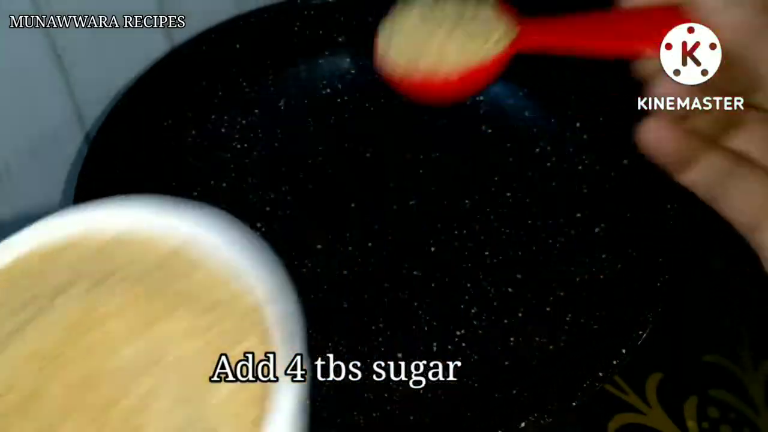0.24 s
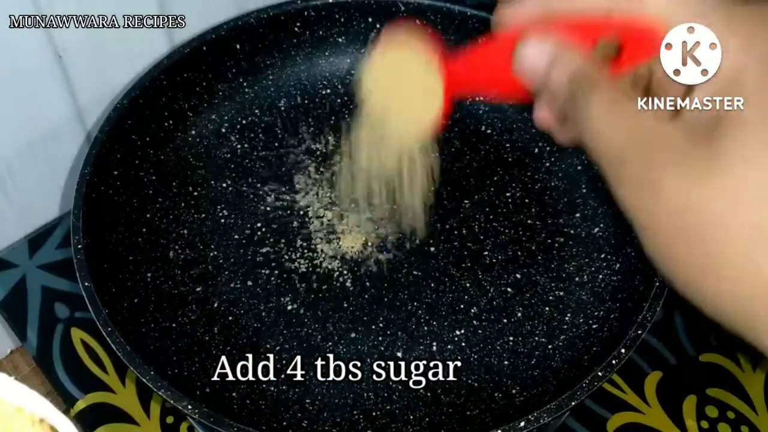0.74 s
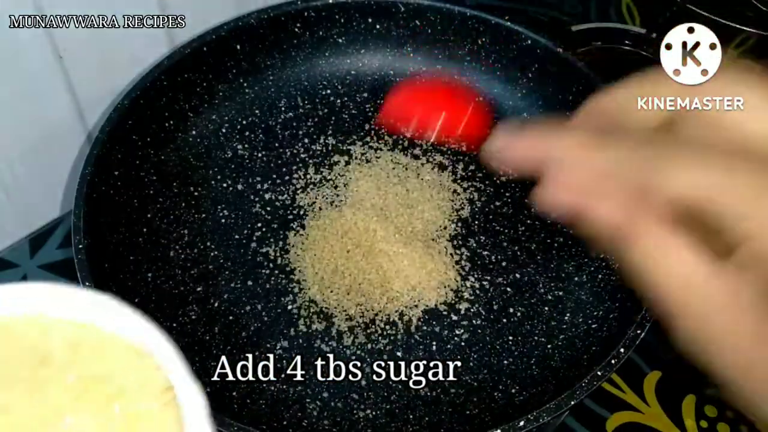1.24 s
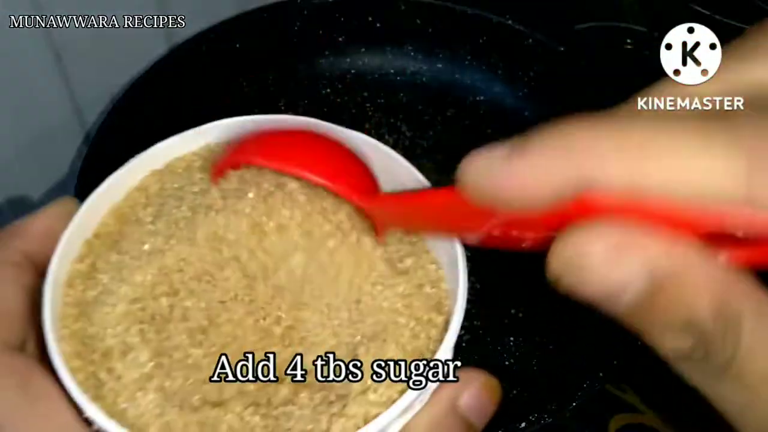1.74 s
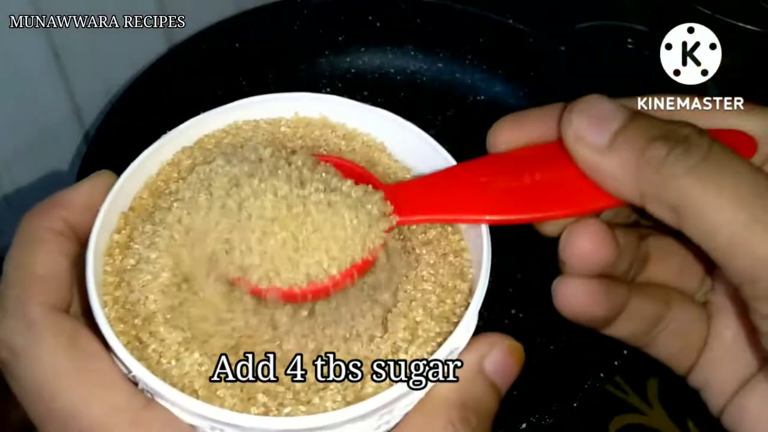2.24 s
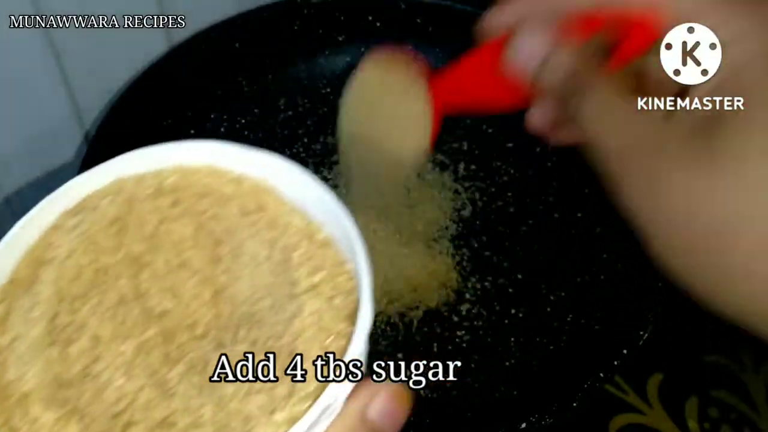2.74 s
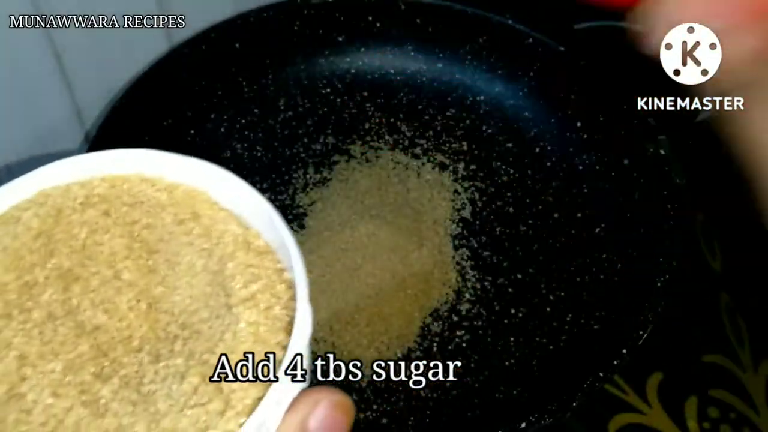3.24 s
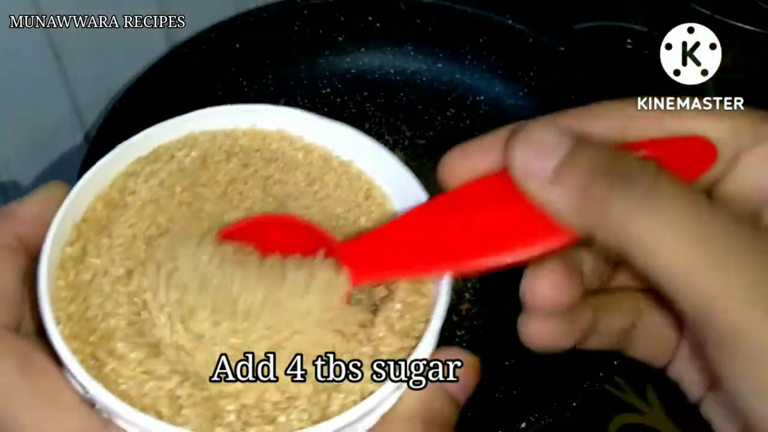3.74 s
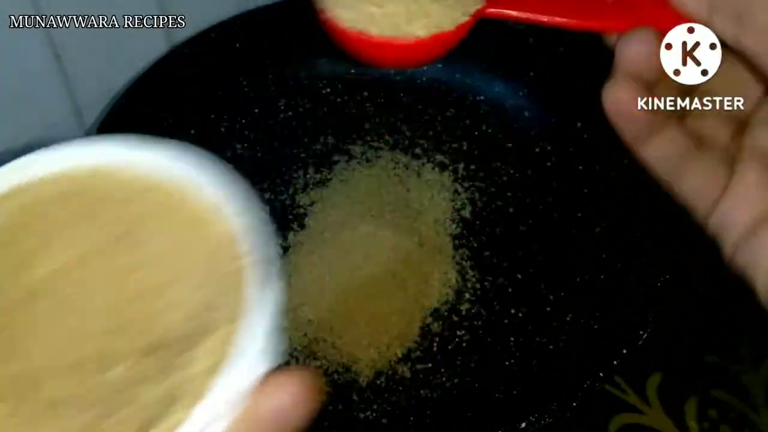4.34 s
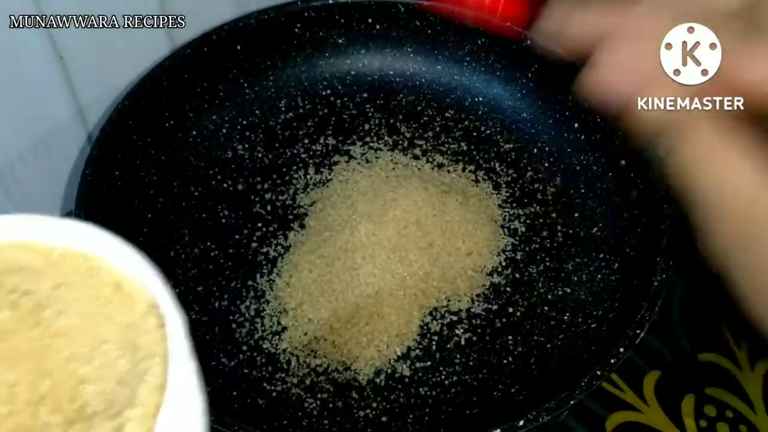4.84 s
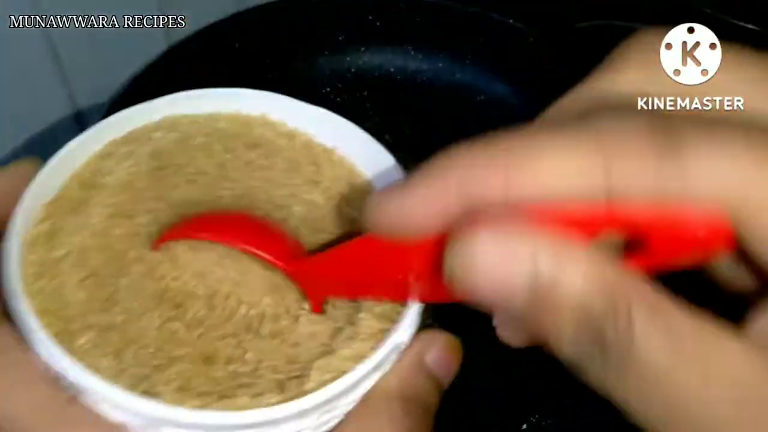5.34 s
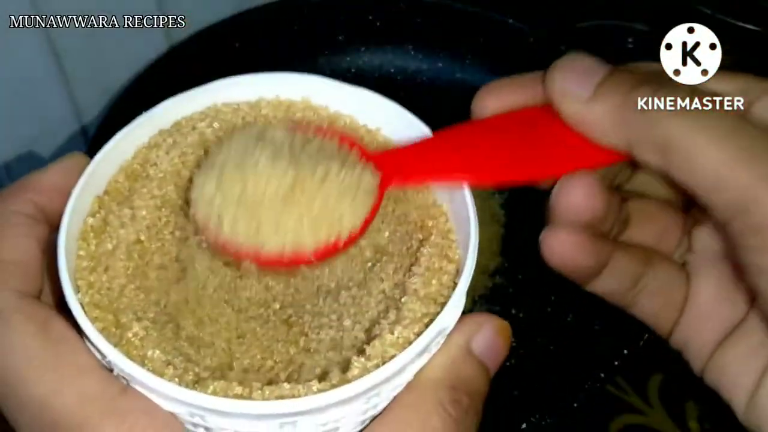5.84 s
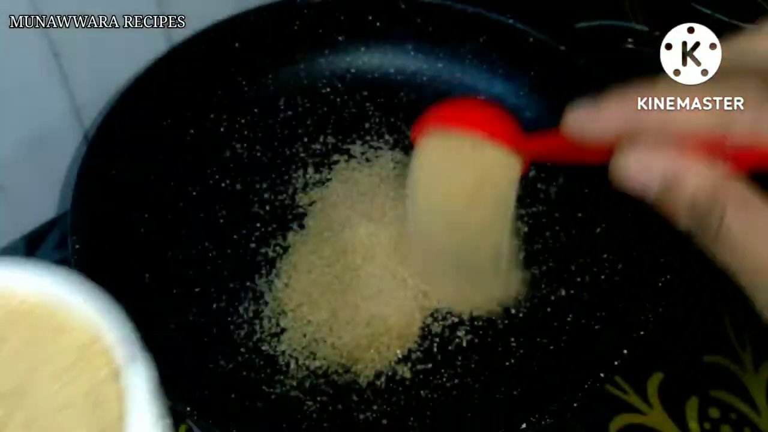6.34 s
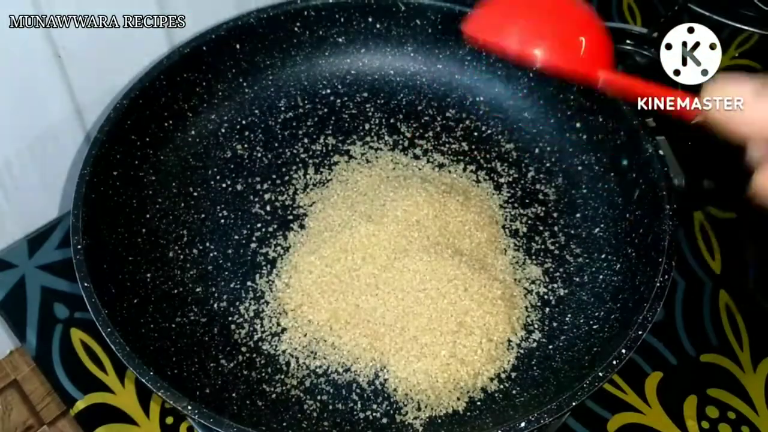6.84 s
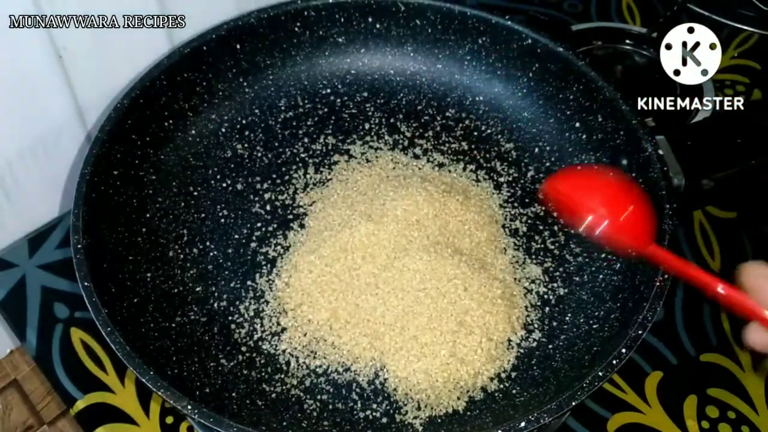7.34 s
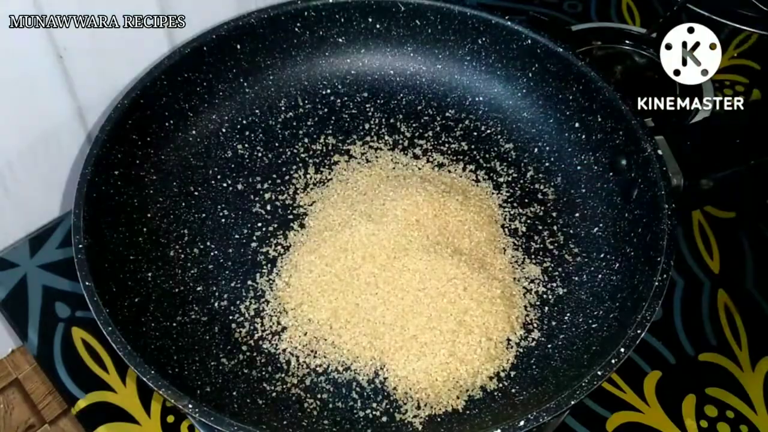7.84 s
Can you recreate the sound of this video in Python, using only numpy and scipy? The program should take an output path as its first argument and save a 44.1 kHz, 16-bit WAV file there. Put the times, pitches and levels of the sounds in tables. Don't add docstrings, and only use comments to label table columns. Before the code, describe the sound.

A close phone microphone in a small, hard kitchen; faint low rumble and a wavering hum underneath, weak details thinned by noise reduction. At 0 s a scrape through sugar is fading; from 0.4 to 0.9 s coarse crystals patter on a bare metal pan, bright and pinging. From 1 to 2 s the spoon grinds into the grit, with a crisp hard bite at 1.6 s. Crystals tick and fizz through 2 to 2.8 s, a stab at 2.55 s, a duller spill at 2.8 s. Digging resumes at 3.3 to 3.9 s with a sharp click at 3.4 s. Another spill hisses at 4.5 s, stabs at 4.7 and 5.1 s, a hollow deep scrape at 5.3 s, a soft stab at 5.9 s, last spill at 6.3 s. Near quiet, then two very loud ringing rim knocks at 7.2 and 7.4 s, a low pan thud at 7.46 s, and a tiny click and scrape around 7.9 to 8.1 s.

```python
import sys
import numpy as np
from scipy import signal
from scipy.fft import rfft, irfft, next_fast_len
from scipy.io import wavfile
from scipy.ndimage import uniform_filter1d, map_coordinates

SR = 44100
rng = np.random.default_rng(int(sys.argv[2]) if len(sys.argv) > 2 else 0)


def invert_db(x):
    u = np.asarray(x, float) / 20
    return 10 ** u


def master_out(mix):
    frames = np.transpose(np.atleast_2d(mix))
    ceiling = np.clip(frames, -1, 1)
    pcm = np.round(ceiling * 32767).astype(np.int16)
    wavfile.write(sys.argv[1], SR, pcm)


N = 356187

# freq_hz, density_db_per_hz
GRIT = [(350, -35), (600, -32.5), (860, -32), (1020, -16), (1980, -17), (2150, -12.5), (2400, -12.5),
        (4340, -9.5), (5710, -2), (7940, 4.5), (11200, -4), (14900, -0.5), (16000, 1.5)]
ZONE_EDGES_HZ = (1900, 4500, 10000)
# time_s, fizz_db, depth_0_1
STIR = [(.36, -110, 1), (.62, -67, 0.88), (.93, -60, 0.91), (1.05, -65, 1), (1.3, -55, 0.72),
        (1.42, -60.5, 0.82), (1.55, -59, 0.67), (1.74, -58.5, 0.95), (2.03, -67.5, 1.02),
        (2.23, -73.5, 0.2), (2.52, -68, 0.6), (2.95, -63.5, 0.51), (3.22, -65, 0), (3.8, -80, 0.3),
        (4.45, -78.5, 0.37), (5.2, -105, 0.4)]
# peak_s, fizz_db, rise_s_per_20db, t60_s, depth_0_1
DIGS = [
    (0.0, -75, .05, 0.33, 1.24),
    (1.345, -62, 0.86, 0.1, 0.4),
    (1.599, -40, 0.05, 0.23, 0.2),
    (1.79, -55.5, 1.09, 0.95, 0.2),
    (3.542, -55, 0.18, 0.56, 0.69),
    (3.86, -74, 0.04, 0.1, 0.5),
    (5.31, -55, .07, 0.5, 0.8),
]
# peak_s, fizz_db, t60_s, depth_0_1
STABS = [
    (2.549, -61.5, 0.48, 0.74),
    (3.345, -63, 0.35, 1),
    (3.868, -68, 0.45, 0.45),
    (4.672, -69.5, 0.52, 0.85),
    (5.084, -56.5, 0.46, 0.8),
    (5.914, -65.5, 0.34, 0.67),
    (8.062, -72.5, .3, 0.4),
]
# bowl_db, crunch_db, fizz_db, air_db
DIG_SHALLOW_DB = (-31.5, -16, 0, -5)
DIG_DEEPER_DB = (28.5, 14, -0.5, 5)
# peak_s, fizz_db, t60_s, fineness_db
SPILLS = [(.17, -72.5, 1, -36), (2.074, -57, 0.52, -2), (2.262, -59, 0.5, -6), (2.284, -56.5, 0.29, -5),
          (2.358, -57, 0.44, -16), (2.61, -58.5, 0.16, 6), (2.673, -55, 0.55, -3), (2.77, -55, .2, -2),
          (2.8, -53, 0.24, 6.5), (3.325, -58, 0.1, 0), (4.524, -56, 0.37, -1.5), (5.262, -55, 0.36, -1.5),
          (5.686, -72.5, 0.17, -16), (6.15, -71.5, 0.63, -3.5), (6.325, -52.5, 0.52, -4.5),
          (6.661, -93, 0.29, 17.5), (6.763, -77.5, 0.22, 12), (7.72, -79, 0.43, -17.5),
          (8.002, -71.5, 0.46, 0.5)]
SPILL_DB = (-35, -16, -2, 2.5)
SPILL_FINER_DB_PER_DB = (0.97, -.2, -0.00084, 1)

# start_s, peak_db, centre_hz, slide_rel_db
TICKS = [(.061, -62, 11200, -20), (0.0807, -44, 7200, -22), (.0807, -50, 5200, -20),
         (.0807, -48, 13600, -22), (1.0193, -44, 8300, -10), (1.1884, -39, 7600, -13),
         (1.2627, -41, 7750, -13), (1.326, -42, 8400, -10), (1.3328, -31, 7950, -17),
         (1.431, -42, 9600, -10), (1.5715, -35, 6900, -12), (1.592, -36, 7670, -16),
         (1.416, -42, 4140, -9.5), (1.512, -42, 6950, -5), (1.7679, -37, 7800, -10),
         (2.0657, -42, 10500, -20), (2.0719, -42, 9200, -15), (2.1269, -37, 9000, -17),
         (2.1486, -39, 9300, -24), (2.2441, -50, 11000, -20), (2.2531, -43, 9700, -14),
         (2.2573, -45, 7500, -8), (2.3482, -38, 8400, -20), (2.3561, -37, 8140, -15),
         (2.4164, -37, 10000, -17), (2.4384, -37, 9700, -22), (2.5267, -42, 7600, -11.5),
         (2.5384, -42, 12400, -18), (2.6683, -33, 8100, -15), (2.7394, -41, 7700, -18),
         (2.7881, -27.5, 9850, -26), (2.7933, -33, 10900, -21), (2.7945, -34, 8500, -22),
         (2.7965, -36, 9500, -22), (3.2881, -49, 7640, -10.5), (3.3189, -47, 6900, -8),
         (4.5131, -44, 9840, -15), (5.2598, -41, 8000, -16), (6.3122, -42, 7760, -12)]
# start_s, peak_db, centre_hz, slide_rel_db
CLICKS = [
    (3.4241, -26, 5150, -23),
    (3.866, -39, 4200, -20),
    (5.0803, -30, 3300, -13),
    (5.088, -39, 3800, -12),
    (6.1434, -58, 8580, -8),
    (6.1752, -43, 5400, -22.5),
    (6.657, -60, 13000, -18),
    (7.8706, -51, 5000, -20),
]
# start_s, peak_db, centre_hz, slide_rel_db
TAPS = [(.005, -58, 3300, -14), (3.4243, -40, 2700, -22), (4.668, -66, 1350, -8), (4.766, -68, 550, -14),
        (1.276, -45.5, 3800, -8), (1.3533, -44, 3100, -8), (1.466, -45, 4100, -5.5), (1.575, -43, 4130, -3),
        (1.727, -47, 2150, -10), (1.727, -50, 1620, -10), (2.548, -57.5, 3920, 0), (3.4243, -41, 1370, -21),
        (3.8655, -53, 1270, -12), (4.766, -61, 1250, -9), (5.0805, -32.5, 1320, -20),
        (5.0812, -33, 2390, -18.5), (7.87, -62, 3280, -12.5), (7.999, -62.5, 1600, -19),
        (8.016, -66, 2680, -15), (5.7568, -54, 2000, -19), (5.7568, -57, 3000, -17),
        (5.915, -49.5, 1880, -16)]

# start_s, peak_db, crack_t60_s
KNOCKS = [
    (7.224, -8.5, 0.014),
    (7.389, -9, 0.016),
]
# freq_hz, density_db_per_hz
CRACK = [
    [(290, -49.5), (500, -25), (1400, -17.5), (2000, 0), (2600, -1), (3100, -14.5), (4550, -6),
     (5180, -10.5), (5640, -9), (7740, -6), (15400, -33.5)],
    [(290, -49), (800, -18), (1400, -12), (1850, -1), (2960, -14), (3520, -5.5), (5180, -15), (7630, -0.5),
     (9320, -11), (13500, -10), (15400, -22)],
]
# freq_hz, level_db, t60_s
SPOON_MODES = [
    [(1750, -9, .03), (2210, 0, .045), (2460, -1, .04), (2720, -5, .03), (3520, -5, .035), (4600, -6, .03),
     (5730, -4, .04), (7800, -4, .03), (11500, -9, .02)],
    [(900, -16, .04), (1690, -1, .035), (1860, -3, .035), (3570, -5, .035), (4500, -9, .03),
     (5700, -5, .03), (6400, -6, .03), (7450, 1, .03), (7950, -1, .025)],
]
# freq_hz, level_db, t60_s
RIM_MODES = [
    [(2019, -7, 0.17), (2229, -12, 0.2), (2457, -13, 0.12), (2880, -18, 0.2), (3488, -12, 0.14),
     (3962, -19, 0.25), (4118, -12, 0.14), (4651, -1, 0.2), (4613, -13, 0.25), (7424, -18, 0.27),
     (5700, -8, 0.19), (6998, -14, 0.16), (7930, -18, 0.2), (8070, -22, 0.26)],
    [(1852, -13, 0.23), (2024, -8, 0.12), (2880, -23, 0.25), (3590, -21, 0.27), (4102, -20, 0.22),
     (4646, -11, 0.12), (5696, -11, 0.14), (5730, -20, .36), (6400, -16, 0.25), (6998, -19, 0.3),
     (7700, -21, .36), (8995, -12, 0.096), (7381, 0, 0.071), (8037, -9, 0.087)],
]
# freq_hz, density_db_per_hz
WALL_ECHO = [
    [(120, -40), (200, -23), (293, -6), (461, -15), (782, -20), (2280, -8), (3110, -17), (4640, -9.5),
     (8150, -14), (15400, -35.5)],
    [(120, -24.5), (200, -5), (327, -4), (1400, -11.5), (1840, -8), (2740, -18), (3600, -13.5), (4990, -15),
     (7440, -5.5), (15400, -24)],
]
# freq_hz, level_db, t60_s
FLOOR_MODES = [(119, 0, .14), (235, -10, .12), (294, -11, 0.24), (349, -4, .14), (460, -12, 0.25),
               (620, -12, .12), (880, -6, 0.14), (1000, -9, .12)]

# start_s, length_s, pitch_hz,
# width_hz, level_db
DRAGS = [(0.14, 0.12, 5400, 705, -66), (.17, .22, 7700, 500, -76), (0.196, 0.094, 950, 280, -69.5),
         (.42, .17, 1500, 500, -77), (2.75, .13, 1050, 250, -73), (.2, .07, 2500, 1500, -76),
         (.21, .22, 11500, 4000, -74), (1.1, .48, 600, 150, -75), (2.4, .12, 1400, 250, -78),
         (0.574, 0.44, 588, 105, -71), (2.047, 0.24, 910, 250, -72.5), (2.303, 0.16, 940, 200, -79.5),
         (2.535, 0.13, 790, 250, -71.5), (2.48, 0.44, 343, 82.5, -60.5), (2.854, 0.34, 1690, 134, -78.5),
         (3.24, .1, 2900, 300, -76), (3.27, .08, 2150, 150, -76), (3.335, .1, 1120, 250, -70),
         (3.447, 0.31, 1080, 420, -63), (3.7, .09, 2150, 120, -76), (4.49, .04, 620, 150, -78),
         (4.66, 0.1, 1330, 250, -73), (4.62, .05, 480, 120, -75), (4.67, 0.07, 600, 300, -74),
         (5.24, 0.27, 1080, 380, -55), (5.3, .2, 760, 200, -68), (5.52, .16, 6100, 500, -82),
         (6.17, .09, 4400, 900, -79), (5.618, 0.07, 1210, 145, -78.5), (5.675, 0.22, 1800, 160, -81),
         (5.7, .17, 2800, 350, -81), (5.76, .17, 2100, 120, -80), (5.94, .09, 650, 150, -80),
         (5.906, 0.2, 1900, 403, -72), (6.292, 0.27, 460, 92, -77.5), (6.293, 0.15, 1570, 200, -75),
         (1.68, 0.51, 800, 252, -68.5), (7.953, 0.12, 320, 88, -70.5), (8.011, 0.06, 5630, 497, -72),
         (8.053, 0.046, 1190, 350, -67.5), (8.061, 0.064, 396, 120, -68)]

# time_s, level_db
ON_BARE = [
    (0.39, -94.5),
    (0.396, -57),
    (0.51, -60.5),
    (0.73, -42.5),
    (0.764, -39),
    (1.0, -59),
]
# time_s, level_db
ON_LOADED = [
    [(2.78, -64), (2.79, -57), (2.87, -57), (3.194, -79), (3.3, -79)],
    [(4.5, -59.5), (4.516, -50), (4.818, -82.5), (4.9, -76)],
    [(6.28, -66.5), (6.316, -52.5), (6.552, -81), (6.62, -104)],
]
# start_s, peak_db, t60_s
DROPS = [(0.3982, -36.5, 0.07), (0.4482, -34, 0.044), (0.4776, -41, 0.05), (0.5117, -36, 0.084),
         (0.56, -43, 0.072), (0.5692, -39, 0.13), (0.6072, -32.5, 0.21), (0.6417, -43, 0.059),
         (0.705, -38, 0.06), (0.7554, -32, 0.07), (.814, -35, .08), (0.8305, -35, 0.04)]
# centre_hz, width_hz, level_db
PAN = [(2170, 24, -9), (3420, 28, -10), (3970, 38, -14), (4350, 70, -12), (5000, 70, -5), (5880, 60, -8),
       (6690, 57, -3), (7100, 120, -4), (7720, 60, 3), (7930, 50, 3), (8300, 100, -3), (8800, 80, 2),
       (9890, 100, -10), (11400, 120, -9)]
# centre_hz, width_hz, level_db
PAN_WALL = [(2460, 35, -15), (2880, 35, -17), (4650, 40, -13), (5370, 55, -12), (5600, 60, -11),
            (6010, 25, -8), (6390, 40, -8), (6980, 30, -3), (9270, 44, -8), (9420, 36, -8), (9670, 30, -9),
            (10500, 80, -10), (12300, 90, -13)]
# centre_hz, width_hz, level_db
LOADED = [(1490, 680, -15), (2464, 170, -3), (3410, 53, -1.5), (5530, 290, -1.5), (6750, 100, 3.5),
          (6900, 17, -8), (7600, 41, 2), (8100, 66, 8.5), (9100, 520, 0), (9640, 53, -3), (11100, 27, 1),
          (11300, 120, -3)]
# start_s, pitch_hz, level_db, t60_s
NOTES = [
    (.306, 2460, -80, .3),
    (.402, 2170, -64, .5),
    (.445, 2176, -69, .3),
    (.57, 3420, -69, .5),
    (.612, 2170, -62, .2),
    (.612, 5000, -61, .25),
    (.755, 2170, -58, .25),
    (.775, 3420, -66, .4),
    (.78, 4340, -64, .4),
    (.92, 3420, -68, .3),
]

# start_s, level_db
THUD = (7.4605, -30)
# freq_hz, level_db, t60_s
HOB_MODES = [(147.4, 0, 0.25), (180, -7, 0.15), (222, -5, 0.09), (290, -6, .06), (337, -9, 0.27)]

# freq_hz, t60_s
KITCHEN_T60 = [(150, 0.52), (1000, 0.33), (4000, 0.34), (14000, 0.28)]
# freq_hz, density_db_per_hz
RUMBLE = [(12, -48), (20, -2), (37, -14), (56, -7), (80, -2.5), (151, -2.5), (201, -10.5), (234, -22),
          (320, -59), (420, -50), (700, -120)]
# freq_hz, density_db_per_hz
HUM = [(110, -40), (165, -4), (220, -2.5), (280, -7), (328, -1), (438, -12), (503, -6.5), (750, -30.5),
       (980, -44), (1650, -120)]
# peak_s, level_db, rise_s_per_20db, t60_s
HUM_SWELLS = [(0.0, -55.5, .05, 0.27), (.66, -72, 0.65, 1.2), (1.2, -63, 1, 0.49), (1.8, -57.5, 0.3, 2.9),
              (2.7, -59.5, 0.6, 1.8), (3.2, -64, 0.84, 1.05), (3.52, -66, 0.5, .35), (3.9, -70, 0.15, 0.27),
              (4.2, -71, 0.14, 0.38), (4.85, -75, .25, .7), (5.33, -71, 0.1, 0.3), (5.77, -74.5, .05, .15),
              (6.36, -82, 0.2, 0.57)]
# freq_hz, level_db
SUPPRESS = [(250, -130), (450, -100), (1500, -100), (5000, -99), (15000, -100)]
# freq_hz, density_db_per_hz
HISS = [(150, -25.5), (300, 8), (1000, -1.5), (3000, -7.5), (8000, -9), (15000, -7)]


def sugar():
    stab_rise_s, spill_rise_s = 0.005, 0.01
    stir_db, stir_depth = curves(STIR)
    bites = DIGS + [(s, db, stab_rise_s, t60_s, depth) for s, db, t60_s, depth in STABS]
    bite_depth = np.array(bites)[:, 4]
    bite_power = swells(bites)
    spill_power = swells([(s, db, spill_rise_s, t60_s) for s, db, t60_s, _ in SPILLS])
    fineness_db = np.array(SPILLS)[:, -1]

    rub = patchy(patter(spread_db=3.5, clump_db=0.6), patchy_db=1.5, tall=8, long=9)
    rub = unit(patchy(rub, patchy_db=2, tall=30, long=2))

    def below(edge, hz):
        return 1 / (1 + (hz / ZONE_EDGES_HZ[edge]) ** 10)

    zones = [lambda hz: below(0, hz),
             lambda hz: below(1, hz) - below(0, hz),
             lambda hz: below(2, hz) - below(1, hz),
             lambda hz: 1 - below(2, hz)]
    settings = zip(zones, DIG_SHALLOW_DB, DIG_DEEPER_DB, SPILL_DB, SPILL_FINER_DB_PER_DB)
    out = 0
    for zone, shallow_db, deeper_db, spill_db, finer in settings:
        strokes = invert_db(2 * (shallow_db + deeper_db * bite_depth)) @ bite_power
        strokes = strokes + invert_db(2 * (spill_db + finer * fineness_db)) @ spill_power
        stirring = invert_db(stir_db + shallow_db + deeper_db * stir_depth)
        gain = np.hypot(smooth(strokes), stirring)
        out = out + gain * unit(filtered(rub, lambda hz: invert_db(along(GRIT, hz)) * zone(hz)))
    return out


def ticks():
    snap_delay_s, crack_t60_s = 0.001, 0.002
    out, t = np.zeros(N + SR), np.arange(SR // 4) / SR
    # table, width over centre, slide_t60_s
    kinds = (TICKS, 0.16, 0.19), (CLICKS, 0.69, 0.016), (TAPS, 0.16, 0.2)
    for rows, wide, slide_t60_s in kinds:
        for s, db, hz, slide_db in rows:
            width_hz = wide * hz
            crack = invert_db(-60 * t / crack_t60_s) * rng.standard_normal(len(t))
            crack = filtered(crack, resonance(hz, 2 * width_hz))
            slide = invert_db(-60 * t / slide_t60_s) * rng.standard_normal(len(t))
            slide = filtered(slide, resonance(hz, width_hz))
            contact = crack / np.abs(crack).max() + invert_db(slide_db) * slide / np.std(slide[:400])
            out[round((s + snap_delay_s) * SR):][:len(t)] += invert_db(db) * contact
    return out[:N]


def knocks():
    hold_s, bloom_s = 0.003, 0.014
    out, t = np.zeros(N + SR), np.arange(SR // 2) / SR
    for (s, db, t60_s), rim, plastic, colour, echo in zip(KNOCKS, RIM_MODES, SPOON_MODES, CRACK, WALL_ECHO):
        blow = invert_db(-60 * np.maximum(t - hold_s, 0) / t60_s) * rng.standard_normal(len(t))
        crack = filtered(blow, lambda hz: invert_db(along(colour, hz)))
        walls = filtered(kitchen(t == 0), lambda hz: invert_db(along(echo, hz)))
        bloom = (1 - np.exp(-t / bloom_s)) * ring(FLOOR_MODES, t, shorten=0.98, scatter_db=1.5)
        voice = invert_db(-6) * crack / np.abs(crack).max()
        voice = voice + invert_db(-12.5) * ring(plastic, t, shorten=0.93, scatter_db=-0.5)
        voice = voice + invert_db(-19) * ring(rim, t, shorten=0.96, scatter_db=-0.5)
        voice = voice + invert_db(-27.5) * walls / np.std(walls[300:1500]) + invert_db(-23.5) * bloom
        out[round(s * SR):][:len(t)] += invert_db(db) * voice
    return out[:N]


def pan(spans, drops, peaks, flow_db, dull_db):
    landing_t60_s = 0.006
    s = np.arange(round((spans[-1][-1][0] + 0.5) * SR)) / SR
    flow = 0
    for rows in spans:
        active = (s >= rows[0][0]) * (s < rows[-1][0])
        flow = flow + invert_db(curves(rows)[0][:len(s)] + flow_db) * active
    for at, db, t60_s in drops:
        age = np.abs(s - at)
        tail = invert_db(db - 13 - 60 * age / t60_s)
        landing = invert_db(db - 5 - 60 * age / landing_t60_s)
        flow = flow + (tail + landing) * (s >= at)

    def metal(f):
        response = invert_db(dull_db + along(GRIT, f))
        for k, (hz, width, db) in enumerate(peaks):
            mode = 1j * f * width * 0.95 / (hz * hz - f * f + 1j * f * width * 0.55)
            response = response + (-1) ** k * invert_db(db) * mode
        return response

    rain = patter(spread_db=4.5, clump_db=1.0)
    out = np.pad(filtered(flow * rain[:len(s)], metal), (0, N - len(s)))
    return out / np.sqrt(np.mean(np.abs(metal(np.arange(1., SR // 2))) ** 2))


def first_ring():
    out, t = np.zeros(N + SR), np.arange(SR // 2) / SR
    for s, hz, db, t60_s in NOTES:
        out[round(s * SR):][:len(t)] += ring([(hz, db, t60_s)], t, shorten=1, scatter_db=0)
    return out[:N]


def drags():
    out = np.zeros(N + SR)
    for s, length_s, hz, width_hz, db in DRAGS:
        u = np.arange(SR // 2) / SR / length_s
        u = u[u < 1]
        slips = unit(uniform_filter1d(rng.standard_normal(SR // 2), size=500))
        noise = rng.standard_normal(SR // 2) * invert_db(2.5 * slips)
        tone = unit(filtered(noise[:len(u)], lambda f: resonance(hz, width_hz)(f) ** 2))
        out[round(s * SR):][:len(u)] += invert_db(db) * tone * np.sin(np.pi * u ** 0.65) ** 2
    return out[:N]


def thud():
    out, t = np.zeros(N + SR), np.arange(SR // 2) / SR
    s, db = THUD
    push = (1 - t / 0.0058) * np.exp(-t / 0.0016) * (1 - np.exp(-t / 0.00068))
    boom = ring(HOB_MODES, t, shorten=0.94, scatter_db=-1.0)
    out[round(s * SR):][:len(t)] = invert_db(db + 6) * push + invert_db(db - 1.5) * boom
    return out[:N]


def kitchen(x):
    delay_samples = 180
    hz, t, z = signal.stft(rng.standard_normal(SR // 2), SR, nperseg=256)
    tail = signal.istft(z * invert_db(-60 * t / along(KITCHEN_T60, hz)[:, None]), SR, nperseg=256)[1]
    late = np.pad(1. * x, (delay_samples, 0))
    return signal.fftconvolve(late, tail / np.linalg.norm(tail))[:len(x)]


def background():
    level_db, fade_db_per_s, wander_db = -62, -0.45, 0.8
    s = np.arange(N) / SR
    wander = map_coordinates(rng.standard_normal(N // SR * 2 + 6), [2 * s])
    rumble = invert_db(level_db + fade_db_per_s * s + wander_db * wander) * rush(RUMBLE, patchy_db=0.5)
    hum = invert_db(-4.5) * smooth(swells(HUM_SWELLS).sum(axis=0)) * rush(HUM, patchy_db=3.0)
    return rumble + hum


def patter(spread_db, clump_db):
    sizes = invert_db(spread_db * np.minimum(rng.exponential(size=N), 4))
    clumps = invert_db(clump_db * unit(uniform_filter1d(rng.standard_normal(N), size=400)))
    return unit(sizes * clumps * rng.standard_normal(N))


def ring(modes, t, shorten, scatter_db):
    out = 0
    for hz, db, t60_s in modes:
        level_db = db + scatter_db * rng.standard_normal()
        out = out + invert_db(level_db - 60 * t / (shorten * t60_s)) * np.sin(2 * np.pi * hz * t)
    return (1 - np.exp(-t / 0.00063)) * out


def resonance(hz, width):
    def response(f):
        band = 1j * f * width / (hz * hz - f * f + 1j * f * width)
        return band * (1j * f / (0.5 * hz + 1j * f)) ** 2
    return response


def swells(rows):
    onset_curve, fade_curve = 1.9, 1.25
    at, db, rise_s, t60_s = np.array([row[:4] for row in rows]).T[..., None]
    late_s = np.arange(0, N + 64, 64) / SR - at
    climb_db = 20 * np.abs(late_s / rise_s) ** onset_curve
    fall_db = 60 * np.abs(late_s / t60_s) ** fade_curve
    return invert_db(2 * (db - np.where(late_s < 0, climb_db, fall_db)))


def smooth(power):
    return np.interp(np.arange(N), 64 * np.arange(len(power)), np.sqrt(power))


def rush(spectrum, patchy_db):
    noise = patchy(rng.standard_normal(N), patchy_db, tall=2, long=10)
    return unit(filtered(noise, lambda hz: invert_db(along(spectrum, hz))))


def patchy(x, patchy_db, tall, long):
    z = signal.stft(x, nperseg=512)[2]
    field = uniform_filter1d(rng.standard_normal(z.shape), size=tall, axis=0)
    field = uniform_filter1d(field, size=long, axis=1)
    return signal.istft(z * invert_db(patchy_db * unit(field)), nperseg=512)[1][:N]


def unit(x):
    return x / np.sqrt(np.mean(x ** 2) + 1e-20)


def along(points, hz):
    f, v = np.transpose(points)
    return np.interp(np.log(hz + 1), np.log(f + 1), v)


def curves(rows):
    s, *cols = np.transpose(rows)
    return [np.interp(np.arange(N) / SR, s, c) for c in cols]


def filtered(x, response):
    m = next_fast_len(len(x) + 8192)
    return irfft(rfft(x, m) * response(np.fft.rfftfreq(m, 1 / SR)), m)[:len(x)]


def scene():
    small, low = ticks(), thud()
    falling = pan([ON_BARE], DROPS, sorted(PAN + PAN_WALL), flow_db=-1.5, dull_db=-15)
    falling = falling + pan(ON_LOADED, [], LOADED, flow_db=-5.0, dull_db=-33) + first_ring()
    close = sugar() + drags() + falling + small + knocks() + low
    room = invert_db(-15) * kitchen(small) + invert_db(-6.5) * kitchen(low)
    return (close + room + background())[None]


def suppressed(x, unsure_db):
    memory, floor_db = 0.88, -19
    hz, _, z = signal.stft(x, SR, nperseg=512, noverlap=384)
    waver = uniform_filter1d(rng.standard_normal(z.shape), size=2, axis=0)
    waver = uniform_filter1d(waver, size=24, axis=1)
    noise = invert_db(2 * (along(SUPPRESS, hz)[:, None] + unsure_db * unit(waver)))
    recent = signal.lfilter([1 - memory], [1, -memory], np.abs(z) ** 2, axis=1) + 1e-20
    gain = np.clip(1 - noise / recent, invert_db(floor_db), 1)
    return signal.istft(z * gain, SR, nperseg=512, noverlap=384)[1][:N]


def top_cut(x):
    return signal.sosfilt(signal.butter(12, 16630, fs=SR, output="sos"), x)


def record(dry):
    hiss_db, bass_cut_hz, top_hz = -87.5, 55, 15480
    x = suppressed(dry[0], unsure_db=8)
    x = x + invert_db(hiss_db) * rush(HISS, patchy_db=-2.5)

    def microphone(hz):
        bass = (1j * hz / (bass_cut_hz + 1j * hz)) ** 2
        return invert_db(-30 * np.clip((hz - top_hz) / 150, 0, 1)) * bass

    mix = filtered(x, microphone)[None]
    return top_cut(mix)


dry = scene()
out = record(dry)
master_out(out)
```